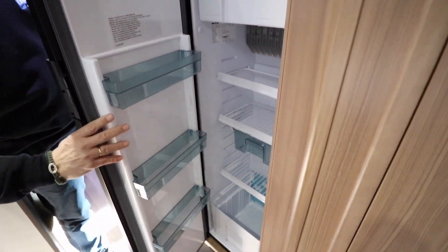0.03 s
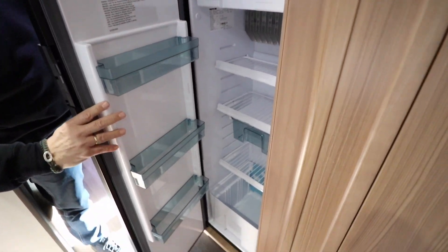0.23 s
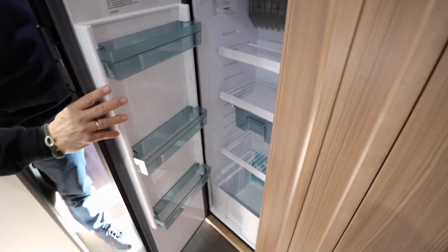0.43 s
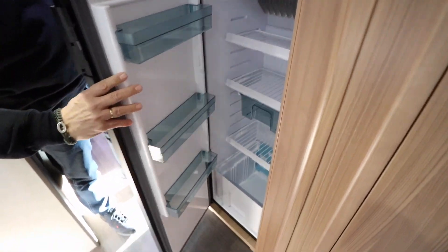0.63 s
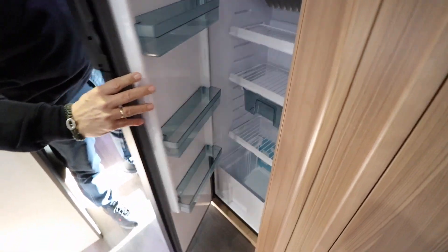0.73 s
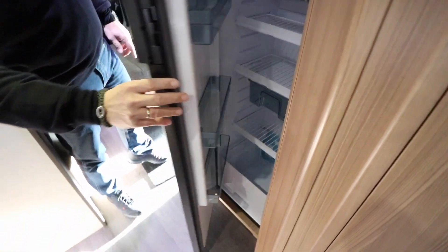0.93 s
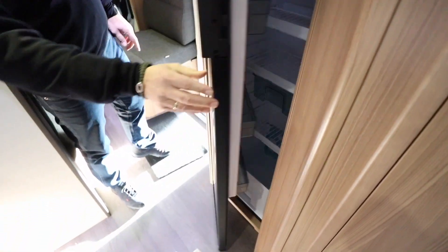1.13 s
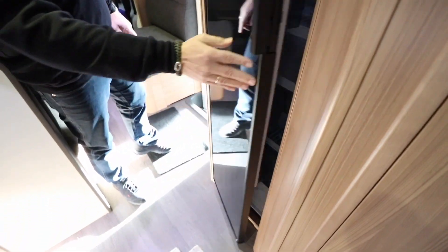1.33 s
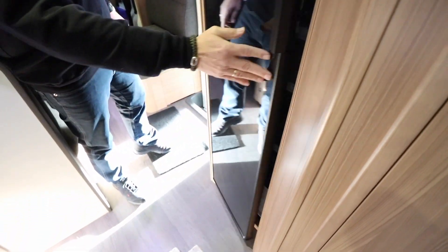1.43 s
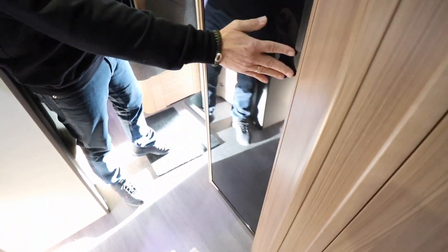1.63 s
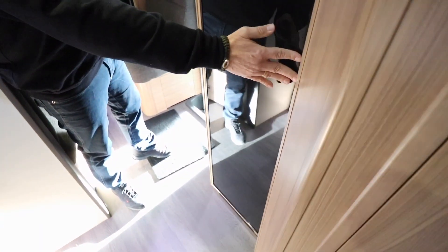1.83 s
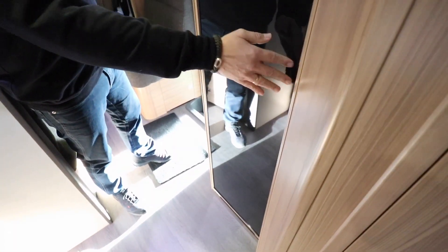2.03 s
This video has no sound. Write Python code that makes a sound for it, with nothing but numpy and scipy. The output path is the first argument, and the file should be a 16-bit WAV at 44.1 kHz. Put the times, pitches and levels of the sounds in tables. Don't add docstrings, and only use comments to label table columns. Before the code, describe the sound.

A tall refrigerator door closes in a small, quiet cabin. Soft, low room tone runs throughout; a barely audible tick comes near 1.4 seconds. From 1.7 seconds light plastic catch clicks quickly build into one loud, hollow clunk at about 1.82, with latch snap, puff of trapped air, shelf rattle and low cabinet boom. It dies by about 1.95 with a very short, dry echo, close up.

```python
import sys
import numpy as np
from scipy import signal
from scipy.fft import rfft, irfft
from scipy.io import wavfile

SR = 44100
rng = np.random.default_rng(int(sys.argv[2]) if len(sys.argv) > 2 else 0)


def dump(signal):
    limited = np.clip(np.atleast_2d(signal).T, -1, 1)
    pcm = np.round(limited * 32767).astype(np.int16)
    wavfile.write(sys.argv[1], SR, pcm)


def makeup_ratio(level_db):
    decades = np.asarray(level_db, float) / 20
    return 10 ** decades


N = 91639

# start in [s], crack level in [dB], latch ring level in [dB],
# door ring level in [dB], chatter decay in [ms].
CONTACTS = [(0.676, -81, -68, -47, 8.1), (1.35, -60.5, -79, -72, 8.5), (1.422, -50.5, -56, -74, 19),
            (1.7054, -33, -30.5, -38, 10), (1.7442, -27.5, -19.5, -27.5, 4.5),
            (1.753, -24, -50.5, -31.5, 8), (1.762, -57.5, -26, -26, 6), (1.778, -22, -16.5, -19, 15),
            (1.8043, -19, -16.5, -41.5, 9.7), (1.8216, -1, -12.5, -16, 6.5), (1.8255, -7.5, -4.5, -16.5, 3),
            (1.835, -11.5, -8, -9, 7.8), (1.8476, -10, -37.5, -17.5, 5.2), (1.858, -12, -42, -21.5, 14),
            (1.870, -14.5, -23.5, -26, 8), (1.883, -50, -53, -48, 3.5), (1.9, -34.5, -51, -36.5, 7.4)]
# frequency in [Hz], level in [dB], t60 in [s].
LATCH_MODES = [(975, -6, 0.012), (1072, -3, 0.029), (1240, -4.5, 0.019), (1330, -8, 0.014),
               (1640, -11, 0.02), (1768, -21.5, 0.06), (2160, -11.5, .025), (2516, -19.5, 0.027),
               (2830, -20, 0.012), (3076, -22, .018), (3415, -16, 0.011)]
# frequency in [Hz], level in [dB], t60 in [s].
DOOR_MODES = [(166.5, -3, 0.035), (214, -16.5, 0.15), (282, -0.5, 0.058), (307.5, -4.5, 0.06),
              (357, -10, 0.035), (410.4, -3, 0.056), (444, -4, 0.091), (499, -4.5, .05), (592, -3, 0.018),
              (689, -3, 0.04), (853, -14, 0.04)]
# frequency in [Hz], density in [dB per Hz].
CRACK_SPECTRUM = [(300, -10), (1500, 0), (2300, 5), (3400, 1.5), (4800, -4.5), (7300, -1), (10500, -4),
                  (15500, -11.5), (16500, -58.5)]
# start in [s], level in [dB], frequency in [Hz], t60 in [s].
SNAPS = [(1.425, -46, 3050, .012), (1.426, -50, 1900, .012), (1.438, -50, 2480, .025),
         (1.706, -33, 620, .03), (1.7055, -33, 1320, .02), (1.713, -33, 1850, .015),
         (1.7047, -24, 1014, 0.018), (1.7047, -30, 442, 0.05), (1.7045, -39, 170.6, 0.11),
         (1.760, -34, 169, 0.024), (1.78, -25.5, 1192, 0.022), (1.8262, -11, 1240, 0.025),
         (1.8278, -11, 1240, 0.015), (1.8275, -9, 1072, 0.027), (1.778, -32, 3100, .02),
         (1.838, -12, 500, .05), (1.852, -13, 500, .04), (1.833, -20, 3200, .02), (1.876, -20, 500, .035),
         (1.869, -24, 3300, .015), (1.829, -11, 280.8, 0.069), (1.837, -19, 214, .1),
         (1.847, -21.5, 601, 0.064), (1.868, -12.5, 445, 0.045)]
# frequency in [Hz], level in [dB].
PUFF_MODES = [(208, -11.5), (400, -21)]
# start in [s], rise in [s], t60 in [s], level in [dB],
# frequency in [Hz].
HEAVES = [(1.708, .015, .15, -41, 52), (1.742, .012, .15, -39, 78), (1.834, .03, .12, -18.5, 47),
          (1.834, .012, .1, -30, 72), (1.9, .015, .15, -35, 250), (1.815, .015, .35, -29, 136),
          (1.895, .02, .12, -37, 42), (1.915, .012, .12, -38, 140), (1.955, .04, .25, -38, 46),
          (1.94, .015, .2, -44, 105), (1.93, .02, .3, -44, 314), (1.94, .02, .3, -44, 165),
          (2.03, .015, .1, -46, 90)]
# frequency in [Hz], density in [dB].
ROOM_TONE_SPECTRUM = [(22, -34), (70, -2), (250, -6), (700, -9), (1150, -19), (2600, -22), (6500, -41.5),
                      (13000, -51.5), (16000, -59)]

CHATTER_PER_S, CHATTER_RISE_MS, SIZE_SPREAD_DB, STRIKE_SPREAD_DB = 5000, 0.95, 0, 2.5
GENTLE_BELOW_DB, GENTLE_CUT_HZ = -15.5, 7000
SNAP_CUT_PER_PITCH = 2.44
PANEL_CUT_HZ = 145
SEAL_S, SEAL_RISE_S, SEAL_HOLD_S, SEAL_FALL_S = 1.8039, 0.002, 0.0075, 0.003
CABIN_T60_S, BRIGHT_T60_S, FIRST_ECHO_S, CABIN_DB = 0.15, 0.09, 0.003, -8
ROOM_TONE_DB = -52.5


def ring(clicks, hz, t60_s):
    r = makeup_ratio(-60 / (t60_s * SR))
    w = 2 * np.pi * hz / SR
    return signal.lfilter([0, np.sin(w)], [1, -2 * r * np.cos(w), r * r], clicks + 1e-18)


def soft(x, cut_hz):
    r = np.exp(-2 * np.pi * cut_hz / SR)
    return signal.lfilter([(1 - r) ** 2], [1, -2 * r, r * r], x)


def coloured(x, points):
    hz, db = np.transpose(points)
    grid_hz = np.maximum(np.arange(4097) * SR / 8192, 1)
    log_gain = np.interp(np.log(grid_hz), np.log(hz), db) * np.log(10) / 20
    cepstrum = irfft(log_gain)
    cepstrum[1:4096] *= 2
    cepstrum[4097:] = 0
    impulse = irfft(np.exp(rfft(cepstrum)))
    return signal.fftconvolve(x, impulse)[:N]


def chatter():
    t = np.arange(2048) / SR
    draws = rng.random((len(CONTACTS), 3, len(t)))
    sizes = makeup_ratio(-SIZE_SPREAD_DB * np.log(draws[:, 0] * 0.99 + 0.01))
    signs = np.sign(draws[:, 1] - 0.5)
    swarms = sizes * signs * (draws[:, 2] < CHATTER_PER_S / SR)
    swarms = swarms * (1 - np.exp(-(t + 2 / SR) * 1e3 / CHATTER_RISE_MS))
    swarms[:, 0] = -0.8
    decay_s = np.array(CONTACTS)[:, 4:] / 1000
    swarms = swarms * np.exp(-t / decay_s)
    return swarms / np.sqrt(np.sum(swarms ** 2, axis=1, keepdims=True))


def placed(swarms, db):
    out = np.zeros(N + SR)
    for row, swarm, gain in zip(CONTACTS, swarms, makeup_ratio(db)):
        i = int(row[0] * SR)
        out[i:i + len(swarm)] += gain * swarm
    return out[:N]


def struck(swarms, db, modes):
    spread_db = STRIKE_SPREAD_DB * rng.standard_normal((len(CONTACTS), len(modes)))
    out = np.zeros(N)
    for k, (hz, level_db, t60_s) in enumerate(modes):
        clicks = placed(swarms, db + level_db + spread_db[:, k])
        out += (-1) ** k * ring(clicks, hz, t60_s)
    return out


def door():
    swarms = chatter()
    _, crack_db, latch_db, door_db, _ = np.array(CONTACTS).T
    gentle = crack_db[:, None] < GENTLE_BELOW_DB
    crack_swarms = np.where(gentle, soft(swarms, GENTLE_CUT_HZ) * makeup_ratio(3), swarms)
    crack = coloured(placed(crack_swarms, crack_db + 14), CRACK_SPECTRUM)
    latch = struck(swarms, latch_db - 6, LATCH_MODES)
    panel = struck(swarms, door_db - 6, DOOR_MODES)
    return crack + latch + panel


def snaps():
    out = np.zeros(N)
    for start_s, db, hz, t60_s in SNAPS:
        click = -makeup_ratio(db) * (np.arange(N) == int(start_s * SR))
        out += ring(soft(click, SNAP_CUT_PER_PITCH * hz), hz, t60_s)
    return out


def seal():
    t = np.arange(N) / SR - SEAL_S
    rise = np.clip(t / SEAL_RISE_S, 0, 1)
    fall = np.exp(-np.maximum(t - SEAL_RISE_S - SEAL_HOLD_S, 0) / SEAL_FALL_S)
    swing = sum(makeup_ratio(db) * np.sin(2 * np.pi * hz * t) for hz, db in PUFF_MODES)
    return -rise * fall * swing


def cabinet():
    out = np.zeros(N)
    for start_s, rise_s, t60_s, db, hz in HEAVES:
        t = np.maximum(np.arange(N) / SR - start_s, 0)
        swell = np.sin(np.pi / 2 * np.minimum(t / rise_s, 1)) ** 2
        decay = makeup_ratio(db - 60 * np.maximum(t - rise_s, 0) / t60_s)
        out += swell * decay * np.sin(2 * np.pi * hz * t)
    return out


def cabin(x):
    t = np.arange(SR // 2) / SR
    noise = soft(rng.standard_normal(len(t)), 11600)
    low = soft(noise, 2600)
    high = noise - low
    tail = low * makeup_ratio(-60 * t / CABIN_T60_S) + high * makeup_ratio(-60 * t / BRIGHT_T60_S)
    tail = tail * (t > FIRST_ECHO_S)
    return signal.fftconvolve(x, tail / np.sqrt(np.sum(tail ** 2)))[:N]


def rms_one(x):
    return x / np.sqrt(np.mean(x ** 2) + 1e-20)


def drift(rate_hz):
    r = np.exp(-2 * np.pi * rate_hz / SR)
    wander = signal.lfilter([1], [1, -2 * r, r * r], rng.standard_normal(N + SR))
    return rms_one(wander[SR:])


def room_tone():
    level_db = ROOM_TONE_DB + 0.69 * drift(17)
    noise = rms_one(coloured(rng.standard_normal(N), ROOM_TONE_SPECTRUM))
    return makeup_ratio(level_db) * noise


def scene():
    panel_cut = signal.butter(4, PANEL_CUT_HZ, "high", fs=SR, output="sos")
    hits = signal.sosfilt(panel_cut, door() + snaps())
    mix = hits + seal() + makeup_ratio(CABIN_DB) * cabin(hits) + cabinet() + room_tone()
    return mix[None]


def band_limit(x):
    return signal.sosfilt(signal.butter(12, 16460, fs=SR, output="sos"), x)


def record(dry):
    rounded = 0.82 * np.tanh(dry / 0.69)
    top_cut = signal.cheby2(10, 60, 16700, fs=SR, output="sos")
    return band_limit(signal.sosfilt(top_cut, rounded))


dry = scene()
out = record(dry)
dump(out)
```